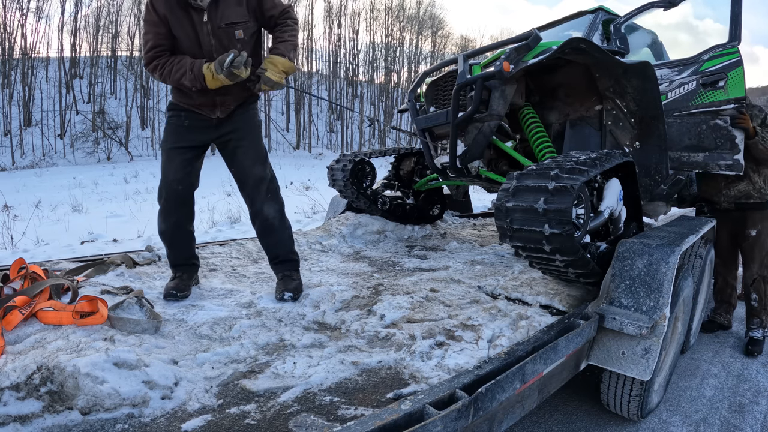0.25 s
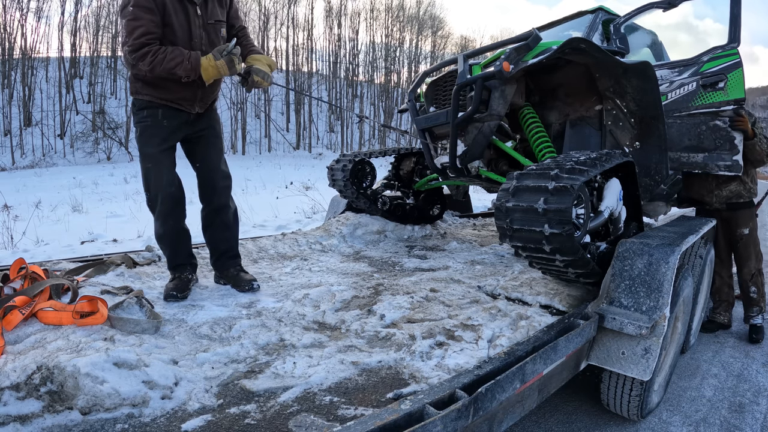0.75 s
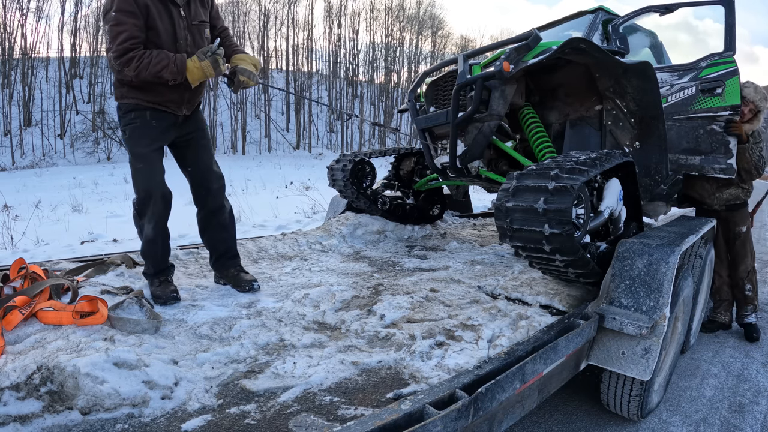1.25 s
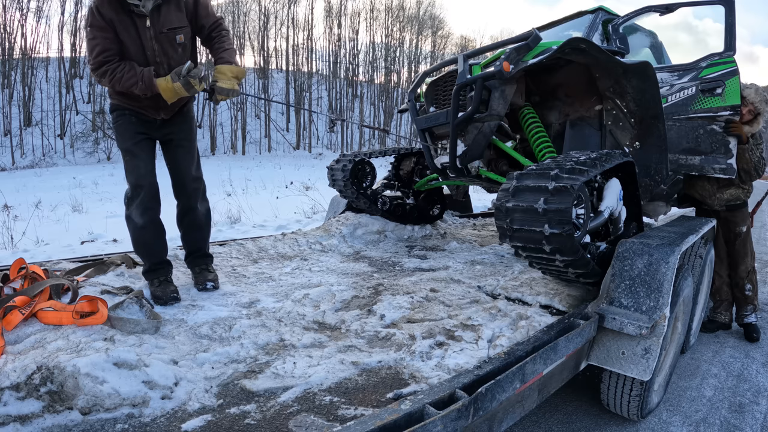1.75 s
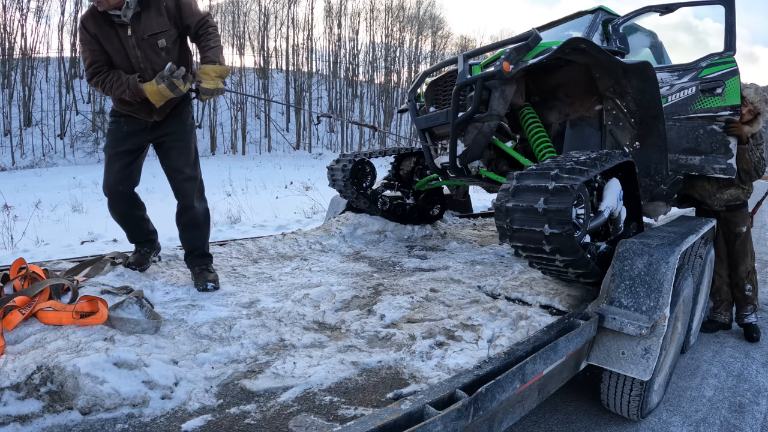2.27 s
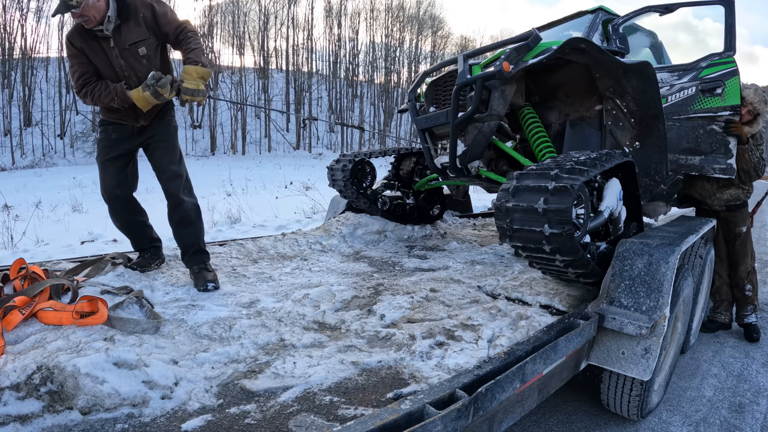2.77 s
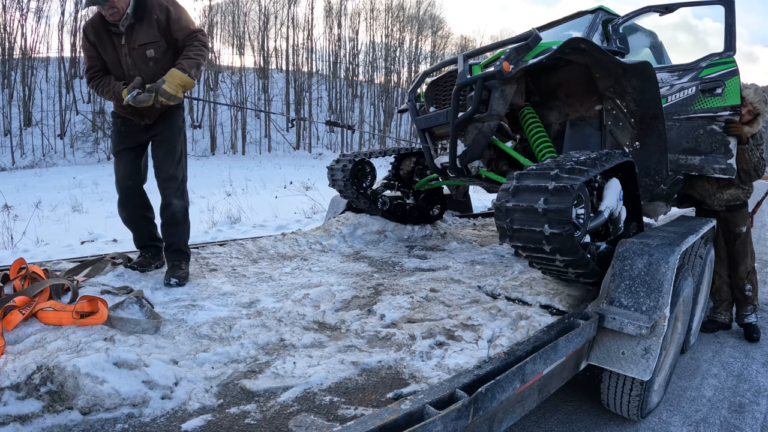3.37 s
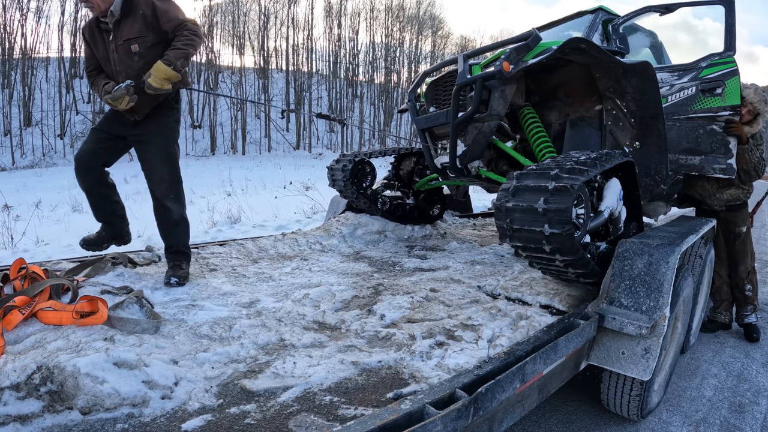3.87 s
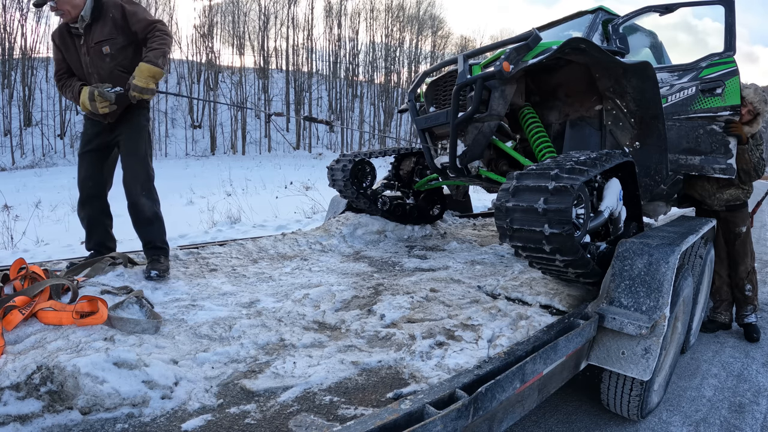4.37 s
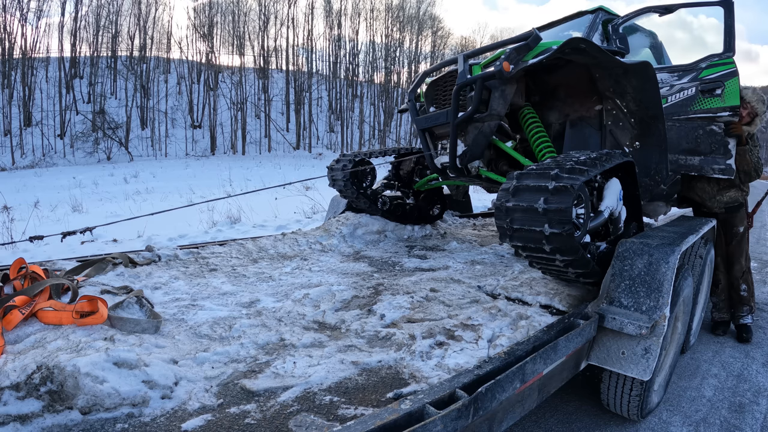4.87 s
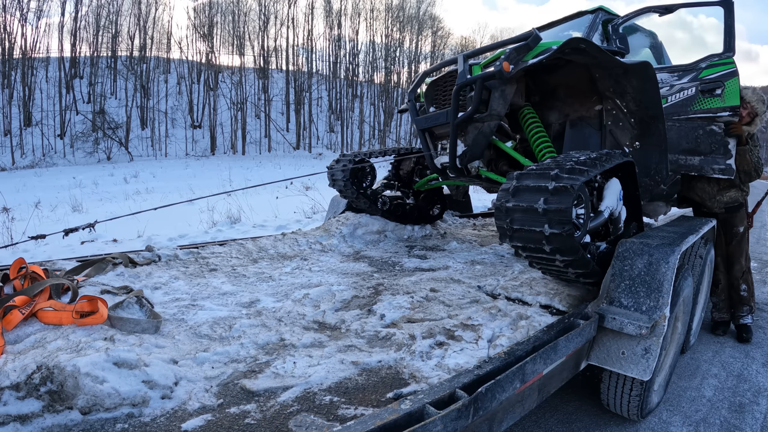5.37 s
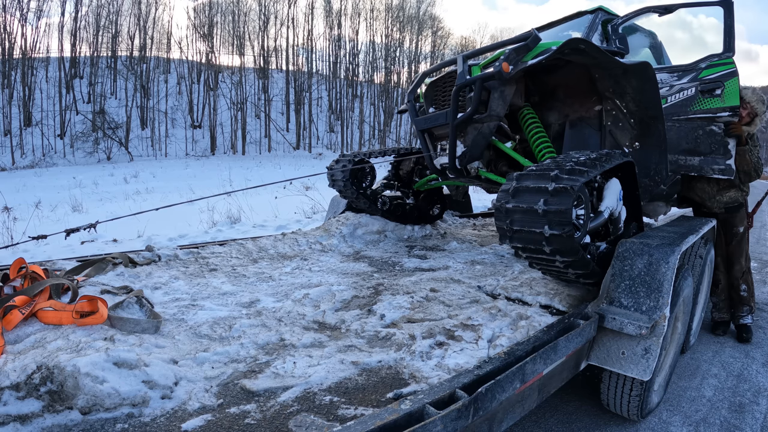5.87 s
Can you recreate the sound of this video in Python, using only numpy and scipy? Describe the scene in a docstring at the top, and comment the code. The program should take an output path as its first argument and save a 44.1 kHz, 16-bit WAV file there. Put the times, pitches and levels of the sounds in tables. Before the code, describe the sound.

Outdoors in snow, a two-cylinder off-road vehicle idles lumpily beside a steady diesel truck, under a constant low roar with faint whines. A man's boots crunch, scrape and thud on the trailer deck, a hook ticks, stiff cloth swishes. Near 4.7 seconds a clicking cut leaves mostly brighter engines, then a wavering whine sinks. Single-channel sound, microphone near the deck.

```python
"""On a snowy trailer a two-cylinder off-road vehicle idles unevenly; beside it a six-cylinder diesel truck idles.
The twin is made of single firings, the diesel of steady tones, and noise with whines is the roar of both.
A man walks over the deck paying out a winch cable: shaped noise makes crunches, slides and cloth swishes,
and short pushes ring the deck and the metal hook. At one instant the sound is cut with a click to another moment:
both idles at other places in their cycles, the exhaust brighter, no cloth. Late on a wavering whine glides down."""
import sys
import numpy as np
from scipy import signal
from scipy.fft import rfft, irfft, next_fast_len
from scipy.io import wavfile
from scipy.ndimage import uniform_filter1d

SR = 44100
rng = np.random.default_rng(int(sys.argv[2]) if len(sys.argv) > 2 else 0)


def wav_out(sig):
    """Save sig, one row per channel (or a flat mono array), as 16-bit PCM at SR to the path in sys.argv[1]."""
    wavfile.write(sys.argv[1], SR, np.round(np.clip(np.atleast_2d(sig).T, -1, 1) * 32767).astype(np.int16))


N = 270333
T = np.arange(N) / SR  # time in seconds
CUT_S = 4.6939  # when the cut comes, in seconds


def amp(db):
    """Turn dB into a plain factor."""
    return 10 ** (np.asarray(db) / 20)


def unit(x):
    """Scale a sound to an rms of 1."""
    return x / np.sqrt(np.mean(x ** 2) + 1e-20)


def read(points, hz):
    """Read a curve of (Hz, value) points, with straight lines between them on a log pitch scale."""
    point_hz, value = np.transpose(points)
    return np.interp(np.log(hz + 1), np.log(point_hz + 1), value)


def wander(hz):
    """Slow random drift of rms 1: sixteen sines with random starts, the fastest at hz."""
    coarse = T[::32]
    speeds = np.geomspace(hz / 20, hz, num=16)
    drift = sum(np.sin(2 * np.pi * (speed * coarse + rng.random())) for speed in speeds)
    return unit(np.interp(T, coarse, drift))


def ring(x, hz, width):
    """One resonance of gain 1 at hz; the narrower it is, the longer it rings."""
    decay = np.exp(-np.pi * width / SR)
    return 2 * signal.lfilter([1 - decay], [1, -decay * np.exp(2j * np.pi * hz / SR)], x).real


def swell(s, length):
    """A smooth rise and fall around the moment s; it is down to about a seventh half a length away."""
    return np.exp(-8 * ((T - s) / length) ** 2)


# The twin's idle hunts up and down about twice a second.
# Each row: time in seconds, engine cycles per second, change of firing strength in dB.
TWIN_IDLE = [(0, 10.35, 0), (.4, 10.42, .5), (.58, 10.09, .5), (.8, 10.58, 1), (1.1, 9.92, -.5),
             (1.36, 10.3, .5), (1.52, 10.08, 1), (1.76, 10.53, 1), (2, 9.89, -1.5), (2.25, 10.44, -2),
             (2.5, 9.97, 1), (2.72, 10.53, 2.5), (3.2, 9.81, -2), (3.5, 10.78, -.5), (4, 10.04, 0),
             (4.23, 10.55, 1), (4.47, 10.28, 0), (4.69, 10.46, -.5), (5.41, 10.33, 1), (5.68, 10.52, 2),
             (6.13, 10.37, .5)]
# The exhaust colours every firing. Each row: pitch in Hz, relative level in dB.
EXHAUST_COLOUR = [(15, -44), (31, -20.5), (41, 10), (51, 13), (64, 3.5), (82, 4.5), (95, 0), (120, 3),
                  (135, -0.5), (160, -22), (230, -16.5), (400, -71.5), (800, -110)]
TWIN_DB = -21.5
TWIN_START, TWIN_AFTER_CUT = -.108, .265  # place in the engine cycle at the start and just after the cut
TWIN_GAP, TWIN_LEAD = .25, -.1  # cycles between the two firings; turns by which each wave leads


def twin():
    """Two firings a quarter cycle apart, then a long pause; each differs a little in force and timing."""
    s, rate, strength_db = np.transpose(TWIN_IDLE)
    angle = np.cumsum(np.interp(T, s, rate)) / SR
    cycle = np.arange(-2, 70)
    chance = rng.standard_normal((len(cycle), 2, 2))
    fire_at = cycle[:, None] + [0, TWIN_GAP] + 0.019 * chance[..., 0]
    force = amp(1.3 * chance[..., 1] + [0, -1.2])  # the second firing is usually weaker
    size = next_fast_len(N + SR)
    hz = np.fft.rfftfreq(size, 1 / SR)
    colour = amp(read(EXHAUST_COLOUR, hz)) * np.exp(2j * np.pi * TWIN_LEAD)
    shift_after = TWIN_AFTER_CUT - angle[round(CUT_S * SR)] % 1
    before_after = []
    # beyond the cut the exhaust is brighter: more of it lies above 88 Hz
    for shift, bright_db in ((TWIN_START, 0), (shift_after, 3.5)):
        place = np.searchsorted(angle + shift, fire_at.ravel())
        inside = (place > 0) * (place < N)
        fires = np.bincount(place, force.ravel() * inside, size)
        brightness = np.where(hz > 88, amp(bright_db), 1)
        before_after.append(unit(irfft(rfft(fires) * colour * brightness, size)[:N]))
    level = amp(TWIN_DB + np.interp(T, s, strength_db))
    return level * np.where(T < CUT_S, *before_after)


# The diesel's steady tones. Each row: multiple of the cycle rate, level in dB rms.
DIESEL_TONES = [(6, -23), (9, -31.5), (10, -28), (12, -36.5), (15, -36), (18, -58), (20, -48), (21, -43.5),
                (36, -56.5), (54, -57.5), (58, -56.5), (72, -46), (78, -55.5)]
# Cycles per second; place in the cycle at the start; cycles between the two sides of the cut.
DIESEL_HZ, DIESEL_START, DIESEL_CUT = 8.371, .243, .46


def diesel():
    """Steady multiples of the cycle rate, each wavering slightly in level."""
    angle = DIESEL_HZ * T + DIESEL_START + DIESEL_CUT * (T >= CUT_S)
    out = np.zeros(N)
    for multiple, db in DIESEL_TONES:
        level = np.sqrt(2) * amp(db + 0.31 * wander(hz=5.9))
        out += level * np.cos(2 * np.pi * round(multiple) * angle)
    return out


# Fuzzy engine whines. Each row: pitch in Hz, width in Hz, middle level in dB rms.
ENGINE_WHINES = [(259.4, 25, -55), (455.5, 5.4, -56), (736, 90, -49.5), (778.3, 27, -52), (1032, 44, -53),
                 (1112, 24, -52), (1165, 24, -51.5), (1247, 14, -56.5), (1580, 16, -58.5),
                 (1798, 14, -61.5), (1894, 49, -61), (2090, 24, -62.5), (2548, 82, -62), (4835, 210, -69),
                 (5130, 80, -68.5), (6030, 77, -72)]
# Running noise of both engines. Each row: pitch in Hz, relative level in dB per Hz.
ROAR_COLOUR = [(9, -18.5), (28, -6.5), (45, -24.5), (120, -6), (170, -12), (226, -21.5), (371, -29),
               (592, -29.5), (944, -34), (1160, -32), (1460, -37.5), (2100, -43.5), (2800, -47),
               (4000, -53.5), (7200, -59.5), (8600, -73), (10500, -80), (12500, -82.5), (16000, -94)]
# The treble of the roar swells and sinks. Each row: time in seconds, lift in dB (in full from about 1.9 kHz).
TREBLE = [(0, 2), (.24, -1.5), (.5, 2.5), (0.799, 3.5), (1.501, 4), (2.302, 3), (3.002, 3.5), (3.4, 2),
          (4, 2.5), (4.602, 4.5), (5.052, 2.5), (5.451, 5), (5.802, 6.5), (6.13, 4.5)]
LOW_ROAR_DB, HIGH_ROAR_DB = -30., -38.5


def roar():
    """Low noise, patchy high noise that throbs with the diesel's firings, and narrow whines."""
    frames, hz = N // 256 + 5, np.fft.rfftfreq(1024, 1 / SR)
    a, b, patches = rng.standard_normal((frames, 513, 3)).T
    patches = uniform_filter1d(patches, size=10, axis=0)
    patches = unit(uniform_filter1d(patches, size=12, axis=1))
    treble_db = np.interp(np.arange(frames) * 256 / SR, *np.transpose(TREBLE))
    share = np.clip(np.log2((hz + 1) / 520) / 1.86, 0, 1)[:, None]  # how much of the lift each pitch gets
    level_db = read(ROAR_COLOUR, hz)[:, None] + 1.1 * patches + share * treble_db
    spectrum = (a + 1j * b) * amp(level_db) * (hz > 250)[:, None]
    high = signal.istft(spectrum, nperseg=1024, noverlap=768)[1][:N]

    fine_hz = np.fft.rfftfreq(N, 1 / SR)
    low = irfft(rfft(rng.standard_normal(N)) * amp(read(ROAR_COLOUR, fine_hz)) * (fine_hz < 240), N)
    throb = 1 + 0.062 * np.cos(2 * np.pi * 6 * DIESEL_HZ * T)  # six firings a cycle

    noise = rng.standard_normal(N)
    treble_sway_db = 1.7 * (np.interp(T, *np.transpose(TREBLE)) - 3)
    whines = np.zeros(N)
    for pitch, width, db in ENGINE_WHINES:
        # the highest whines come and go with the treble
        level = amp(db + 2.4 * wander(hz=12.0) + treble_sway_db * (pitch > 4000))
        whines += level * unit(ring(ring(noise, pitch, width), pitch, width))
    return amp(LOW_ROAR_DB) * unit(low) + amp(HIGH_ROAR_DB) * unit(high) * throb + whines


# Faint high swishes, as of stiff cloth when the man moves.
# Each row: middle in seconds, peak level in dB rms, length in seconds.
SWISHES = [(0.342, -73, 0.064), (.56, -75, .04), (.62, -71, .06), (0.682, -65, .07), (.95, -85, .15),
           (1.42, -76, .07), (1.51, -73, .04), (1.6, -69, .035), (1.68, -74, .045), (2.335, -75, .09),
           (2.462, -77, .07), (2.54, -78, .05), (2.68, -79, .08), (2.737, -68, .025), (2.812, -76, .025),
           (2.89, -74, .08), (2.97, -81, 0.076), (3.112, -81, .12), (3.7, -88, 0.17), (4.127, -73, .04),
           (4.19, -72, 0.12), (4.437, -71, 0.088), (4.6, -80, .12)]
RUSTLE_BED_DB = -82.5  # up to the cut the cloth never quite rests


def rustle():
    """Flickering noise in one high band, swelling with each swish; there is none beyond the cut."""
    grains = rng.standard_normal(N) * amp(3.5 * wander(hz=250.))
    band = ring(ring(grains, 12300, 2800), 12300, 2800)
    swishes = sum(amp(db) * swell(s, length) for s, db, length in SWISHES)
    bed = amp(RUSTLE_BED_DB + 2.0 * wander(hz=7.2))
    return (swishes + bed) * (T < CUT_S) * unit(band)


# Soles sliding over the crust.
# Each row: middle in seconds, peak level in dB rms, length in seconds, pitch in Hz, width in Hz.
SOLE_SLIDES = [(0.26, -37, 0.026, 950, 400), (0.296, -44, .014, 1010, 600), (.328, -39, 0.029, 1650, 300),
               (.345, -33, 0.061, 715, 250), (0.348, -48, 0.057, 3460, 1200),
               (0.372, -40, 0.16, 1750, 1100), (0.424, -52, .1, 3200, 1000), (0.425, -40, .06, 1330, 500),
               (0.447, -36, 0.064, 420, 250), (0.497, -35, 0.048, 730, 250), (0.65, -36, 0.023, 1400, 700),
               (0.691, -36, .03, 1380, 800), (0.94, -47, 0.084, 396, 300), (1.43, -46, 0.054, 735, 400),
               (2.58, -48, 0.023, 3900, 1200), (2.742, -54, .03, 3800, 1500),
               (2.805, -34.5, 0.55, 181, 120), (2.9, -52, .055, 3900, 1500), (2.964, -48, .018, 3500, 1500),
               (2.978, -38, .07, 734, 300), (2.98, -50, .028, 3500, 1400), (3.09, -47, 0.024, 4000, 1100),
               (3.7, -47, .02, 3440, 1190), (4.144, -31, .05, 280, 150), (4.185, -43, 0.028, 750, 250),
               (4.599, -31.5, 0.11, 260, 150), (4.6, -49, .04, 3800, 1500)]


def slides():
    """Grainy noise in one broad resonance for each slide."""
    grit = rng.standard_normal(N) * amp(2.6 * wander(hz=400.))
    out = np.zeros(N)
    for s, db, length, hz, width in SOLE_SLIDES:
        out += amp(db) * swell(s, length) * unit(ring(ring(grit, hz, width), hz, width))
    return out


# Boots pressing into snow.
# Each row: start in seconds, level in dB, length in seconds, brightness in dB per octave.
BOOT_STEPS = [(0.252, -61, 0.032, 3.5), (0.275, -54.5, 0.089, 3.5), (0.311, -49.5, 0.17, 2),
              (0.4, -52, 0.13, 2.5), (0.612, -55, 0.058, 6.5), (0.651, -51.5, 0.059, 4.5),
              (0.672, -56, 0.042, 8.5), (0.674, -51, 0.083, 3), (0.893, -49.5, 0.14, 1.5),
              (1.154, -58, 0.041, 0.5), (1.391, -47, 0.13, -0.5), (1.717, -51, 0.15, 1.5),
              (2.106, -54.5, 0.11, 1), (2.509, -54, 0.072, 3), (2.619, -48.5, 0.27, 3.5),
              (2.689, -50.5, 0.58, 2), (2.852, -55, 0.11, 5.5), (2.944, -57.5, 0.11, 4),
              (3.083, -52, 0.13, 3), (3.625, -56, 0.079, 4), (3.669, -48, 0.12, 2), (4.137, -50.5, 0.14, 3),
              (4.556, -56.5, 0.09, 5), (5.453, -45, 0.58, 3.5)]
# The colour of crunching snow. Each row: pitch in Hz, relative level in dB per Hz.
SNOW_COLOUR = [(40, -79), (150, 0.5), (300, 12), (700, 6), (1900, -11.5), (3500, -21), (7200, -37),
               (9000, -53), (12500, -65.5), (16000, -75)]


def steps():
    """Snow crystals snap densely under each boot, each snap with its own force; some steps are brighter."""
    out, size, lead = np.zeros(N), 3 * SR // 4, SR // 8  # lead: samples of room before the step
    hz = np.fft.rfftfreq(size, 1 / SR)
    snap_fade = np.exp(-1 / (0.0008 * SR))  # each snap crackles on briefly
    for s, db, length, tilt in BOOT_STEPS:
        n = round(length * SR)
        happens = rng.random(size) < 1800 / SR  # about 1800 snaps a second
        snaps = amp(2.5 * np.minimum(rng.exponential(1, size), 5)) * happens
        clumps = signal.lfilter([1], [1, -snap_fade], snaps ** 2)
        press = np.zeros(size)
        press[lead:lead + n] = np.sin(np.pi * (np.arange(n) / n) ** .6) ** 2  # quick rise, slower fall
        crackle = press * np.sqrt(clumps) * rng.standard_normal(size)
        colour_db = read(SNOW_COLOUR, hz) + tilt * np.log2(np.maximum(hz, 150) / 1000)
        crunch = irfft(rfft(crackle) * amp(colour_db), size)
        crunch = amp(db) * unit(crunch) * np.sqrt(size / n) * np.hanning(size) ** .5
        part = out[round(s * SR) - lead:][:size]
        part += crunch[:len(part)]
    return out


def strikes(rows, modes, gritty):
    """Each blow is a short push, smooth or gritty, that rings the resonances of the thing it hits."""
    out, t = np.zeros(N), np.arange(4000) / SR
    for s, db, contact_ms in rows:
        grit = 1 - gritty + gritty * rng.standard_normal(len(t))
        blow = grit * t * np.exp(-1000 * t / max(contact_ms, .02))
        sound = np.zeros(len(t))
        for k, (hz, width, mode_db) in enumerate(modes):
            rung = ring(ring(blow, hz, width), hz, 2 * width) / width
            sound += (-1) ** k * amp(mode_db) * rung
        sound = np.diff(sound, prepend=0)
        out[round(s * SR):][:len(t)] -= amp(db) * sound / abs(sound).max()
    return out


# The cable hook ticks or briefly drags.
# Each row: start in seconds, peak level in dB, contact time in ms.
HOOK_TICKS = [(0.2625, -42, 0.98), (0.537, -40, .6), (0.6335, -31, 0.24), (.6465, -40, 0.54),
              (.6615, -41, 1.2), (0.6844, -40, .9), (1.403, -47, .7), (1.429, -35.5, 1.1),
              (2.079, -34, 0.27), (2.5378, -29.5, .3), (2.5405, -35, .5), (2.8765, -38, .9),
              (2.962, -38, .4), (3.085, -43, .4), (3.6905, -34, 1.1)]
# How the hook rings. Each row: pitch in Hz, width in Hz, relative strength in dB.
HOOK_MODES = [(2560, 340, -1.5), (3440, 610, 7), (4300, 890, 5.5), (5850, 900, -8), (12000, 900, -33)]


def ticks():
    """Small, fully gritty blows ring the metal hook."""
    return strikes(HOOK_TICKS, HOOK_MODES, gritty=1)


# Heels on the deck; a short contact sounds harder.
# Each row: start in seconds, peak level in dB, contact time in ms.
HEEL_THUDS = [(.2926, -19, 0.045), (.339, -22, 0.24), (.9245, -22, 0.44), (1.1572, -29, 0.23),
              (1.4035, -19, 0.2), (1.435, -33, 0.36), (1.866, -21, 0.29), (2.128, -30, 0.35),
              (2.702, -23.5, .25), (2.899, -39, 0.18), (3.1535, -19.5, 0.59), (3.6495, -15, 0.5),
              (3.6893, -22, 0.86), (3.692, -11.5, 0.39)]
# How the deck rings. Each row: pitch in Hz, width in Hz, relative strength in dB.
DECK_MODES = [(215, 87, -1), (434, 220, -5), (620, 280, -2.5), (1030, 620, -7)]


def thuds():
    """Mostly smooth blows ring the broad, low resonances of the deck."""
    return strikes(HEEL_THUDS, DECK_MODES, gritty=.15)


# The gliding whine. Each row: time in seconds, pitch in Hz, level of its plain tone in dB rms.
GLIDING_WHINE = [(5.68, 572, -60), (5.71, 567, -39), (5.79, 553, -39), (5.83, 548, -47), (5.87, 560, -43),
                 (5.905, 556, -38), (5.93, 547, -33), (5.975, 539, -33), (6.005, 535, -40),
                 (6.03, 534, -38), (6.06, 534, -46), (6.1, 536, -44), (6.13, 540, -35)]


def glide():
    """A wavering tone that sinks in pitch, with slow noise shaking its level into a rough halo."""
    s, hz, db = np.transpose(GLIDING_WHINE)
    halo = unit(ring(ring(rng.standard_normal(N), 0, 120), 0, 120))
    turns = np.cumsum(np.interp(T, s, hz) + 1.9 * wander(hz=20.)) / SR
    level = np.sqrt(2) * amp(np.interp(T, s, db, left=-99))
    return level * (1.0 + 0.31 * halo) * np.sin(2 * np.pi * turns)


def scene():
    """Add the engines, the man's sounds and the late whine into one channel."""
    engines = twin() + diesel() + roar()
    man = rustle() + slides() + steps() + ticks() + thuds()
    return (engines + man + glide())[None]


def record(dry):
    """A brief fade-in; the highest peaks are rounded off softly; then the top of the treble is cut."""
    edge_hz = 16500
    dry = dry * np.minimum(T / .003, 1)
    rounded = np.tanh(2.3 * dry) / 2.3
    padded = np.pad(rounded, ((0, 0), (255, 255)), "reflect", reflect_type="odd")
    low_pass = signal.firwin(511, edge_hz, window=("kaiser", 9), fs=SR)
    return signal.oaconvolve(padded, low_pass[None], "valid")


dry = scene()
out = record(dry)
wav_out(out)
```